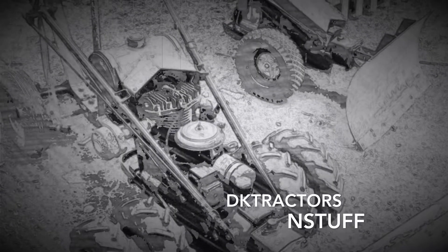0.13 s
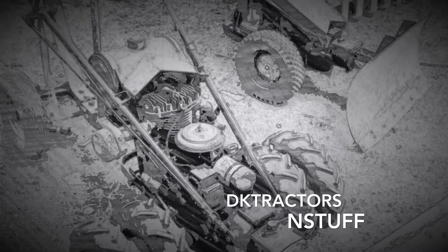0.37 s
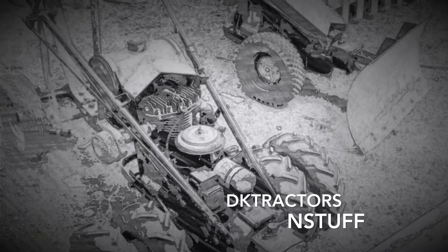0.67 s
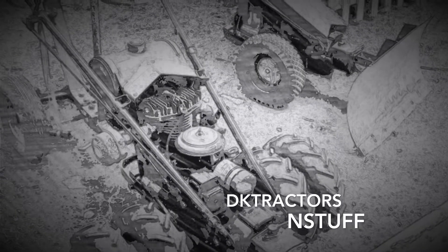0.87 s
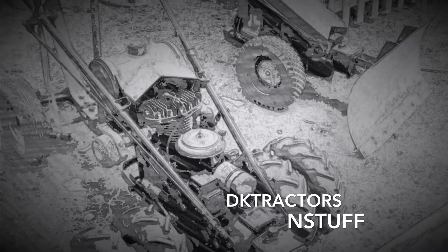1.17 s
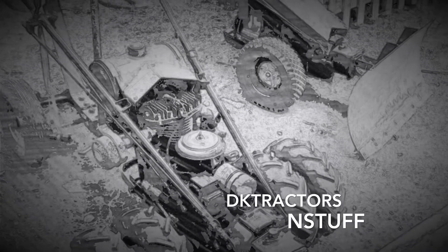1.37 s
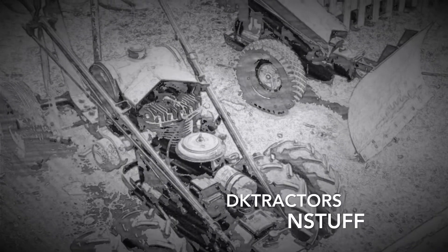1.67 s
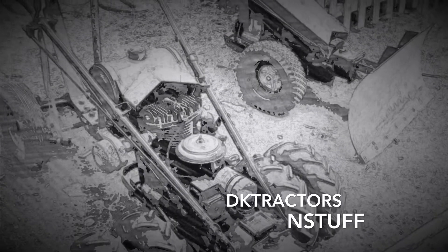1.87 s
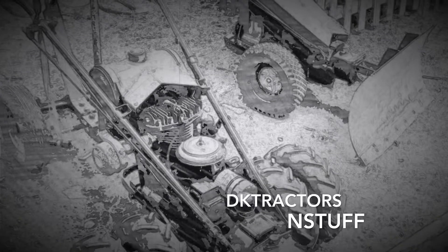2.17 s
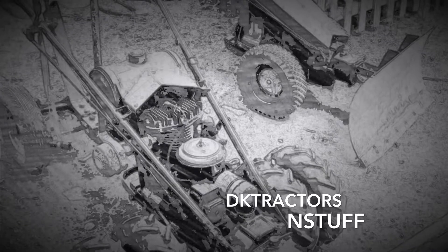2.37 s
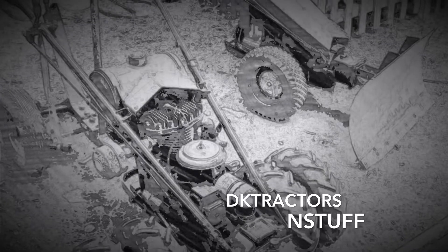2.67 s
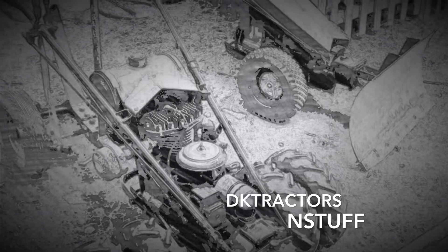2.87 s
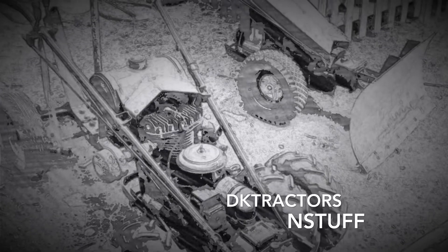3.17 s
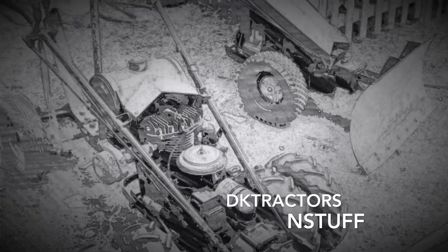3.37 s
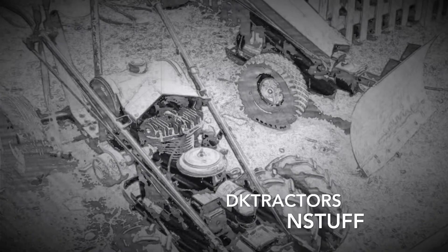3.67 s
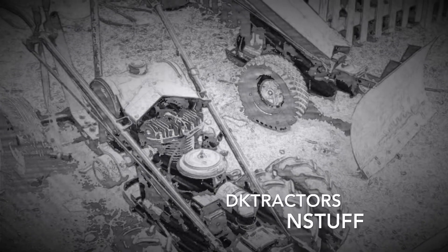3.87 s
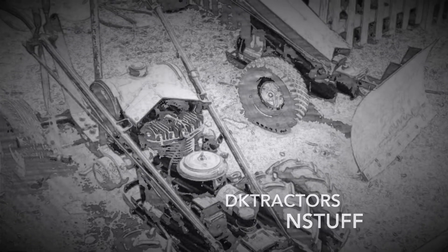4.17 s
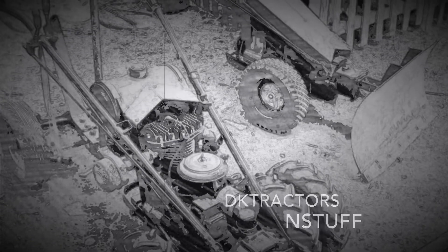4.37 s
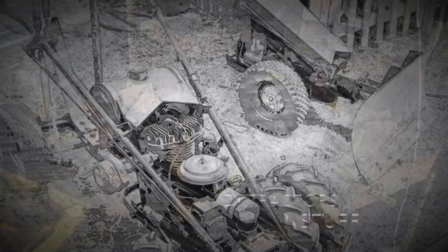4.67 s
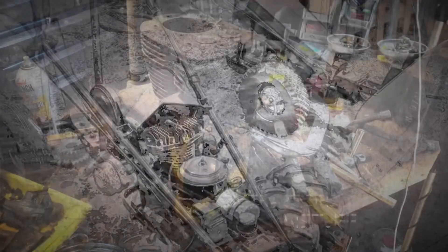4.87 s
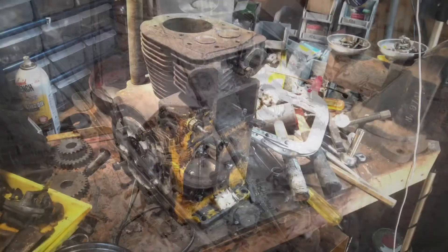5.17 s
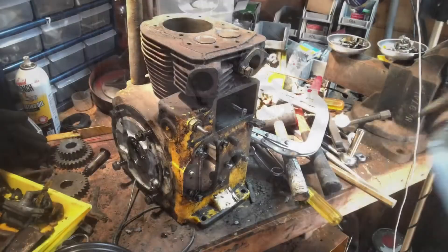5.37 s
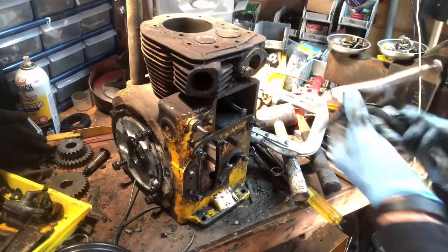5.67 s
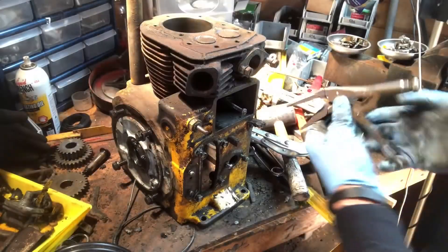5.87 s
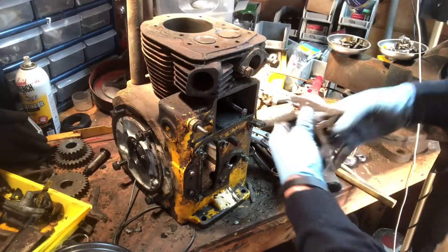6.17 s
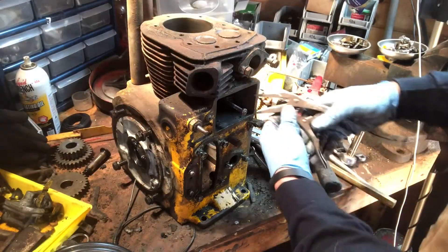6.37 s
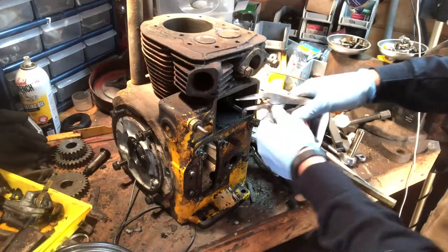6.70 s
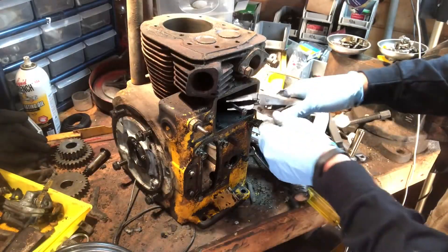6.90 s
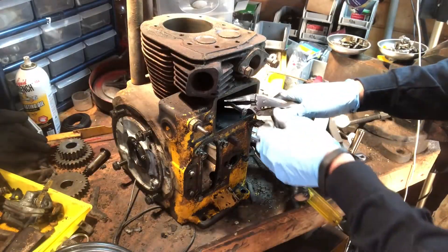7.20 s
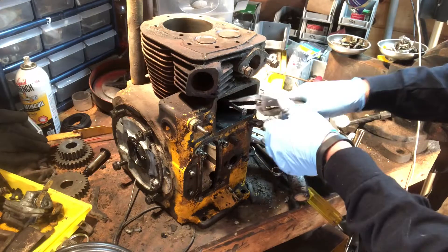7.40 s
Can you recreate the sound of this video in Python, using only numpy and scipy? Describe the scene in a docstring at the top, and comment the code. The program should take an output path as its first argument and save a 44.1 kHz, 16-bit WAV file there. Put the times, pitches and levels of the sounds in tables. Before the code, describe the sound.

Stuttering, clattering putter of a one-cylinder motor, dry and close, fills the first half; missed beats thin out as it evens into a rapid chug. It fades out gradually under faint room air. Then come bright clacks as tools are moved, soft thuds on a wooden bench, grainy glove rubbing, and small, quiet metallic ticks and scrapes against an engine block. The microphone is near the bench.

```python
"""Small engine fading into a workshop

A single-cylinder engine misses unevenly, then picks up speed. Each exhaust stroke rings decaying pipe
modes (thump) and gates gas noise (bark); noise bursts shaped by casing resonances make the clatter. It
fades out over room noise, faint tones and grainy glove rustle. Then filtered noise bursts snap and thud
on a bench, and narrow noise bands clink and slide as a steel hand tool on a cast-iron block.
"""
import sys
import numpy as np
from scipy import signal
from scipy.fft import rfft, irfft, next_fast_len
from scipy.io import wavfile
from scipy.ndimage import uniform_filter1d, map_coordinates

SR = 44100
rng = np.random.default_rng(int(sys.argv[2]) if len(sys.argv) > 2 else 0)


def persist_wave(psi):
    """Save psi, clipped to +-1, as 16-bit WAV."""
    counts = np.round(np.clip(psi, -1, 1) * 32767).astype(np.int16)
    wavfile.write(sys.argv[1], SR, np.atleast_2d(counts).T)


N = 332514

# Engine speed: (time [s], exhaust strokes per second [Hz])
STROKE_RATE = [(-.1, 11.199), (.581, 11.642), (.671, 10.949), (.947, 12.317), (1.102, 11.633),
               (1.886, 12.537), (2.203, 12.107), (2.974, 13.538), (3.37, 12.999), (3.402, 13.66),
               (4.018, 13.493), (4.63, 13.52), (4.686, 13.83), (5.6, 13.416)]
# Charges that fail or burn poorly, at the nearest stroke: (time [s], heat lost [dB])
MISFIRES = [(.06, 20), (.24, 18), (.41, 15.5), (.67, 20), (.85, 20.5), (1.01, 7), (1.27, 14), (1.68, 6.5),
            (2.09, 5.5)]
# Exhaust pipe and muffler modes: (frequency [Hz], base level [dB], t60 [s], polarity [+1/-1])
PIPE_MODES = [(76.4, 7.4, .09, 1), (122, 23.1, .031, -1), (166, 12.9, .051, 1), (245, 20.3, .0234, 1),
              (400, 25.8, .0156, -1), (507, 25.5, .0162, -1), (827, 34.7, .0101, -1)]
# Muffler shell modes, struck by the opening pulse: (frequency [Hz], base level [dB], t60 [s])
SHELL_MODES = [(502.7, -28, 0.3), (795, -19.5, 0.079), (1156, -25.5, .06)]
# Gas jet spectrum: (frequency [Hz], relative density [dB per Hz])
JET_SPECTRUM = [(300, -23.5), (1000, -9.5), (3000, 3.5), (6500, 5.5), (7800, 0), (9000, 3), (12000, 1),
                (15800, 0)]
# Bursts that shake the casing each cycle: (mean delay [s], mean level at zero heat [dB], t60 [s],
# centre [Hz], width [octaves], heat follow [dB per dB])
GEAR_BURSTS = [(.0002, -12, 0.067, 1089, 1.4, 0.44), (.022, -18, .04, 7970, 0.81, 0),
               (.013, -15, 0.25, 1714, 0.97, 0.01), (0.021, -12.5, 0.06, 2397, 2.8, 0),
               (0.023, -22.5, 0.024, 614, .5, 1), (0.037, -15.5, 0.09, 1756, 0.95, 0),
               (.043, -24, 0.049, 10030, .8, 0), (.061, -16.5, 0.02, 1402, 0.72, 0.5)]
# Casing spectrum before the panels: (frequency [Hz], relative density [dB per Hz])
CASING_SPECTRUM = [(150, -14), (205, 6), (270, -0.5), (340, -6.5), (660, -10.5), (900, -1.5), (970, -6.5),
                   (1100, -2), (1600, -7), (1950, -10.5), (2600, -7.5), (4800, -13.5), (6400, -15.5),
                   (7700, -22), (12000, -24.5), (15800, -30)]
# Sheet-metal resonances: (centre [Hz], width [Hz], peak gain [dB])
PANEL_MODES = [(500, 49, 3.5), (594, 74, 9), (805, 54, 1), (1023, 26, 3.5), (1306, 110, 1), (1520, 53, 4.5),
               (2286, 150, 2.5), (2480, 67, 2), (3770, 120, 6), (6500, 130, 2), (8450, 150, 4)]
# Workshop air spectrum: (frequency [Hz], relative density [dB per Hz])
AIR_SPECTRUM = [(20, -19), (45, -9), (80, -9), (120, -10.5), (220, -11), (400, -13.5), (800, -18),
                (1200, -22.5), (4000, -28), (15800, -36)]
# Wavering low tones: (frequency [Hz], mean level [dB])
LOW_TONES = [(123.8, -72), (199.2, -70.5), (301.5, -80)]
# Gloves and sleeves rub: (time [s], length [s], level [dB])
RUBS = [(5.302, 0.24, -60.5), (5.428, .19, -54), (5.561, .11, -63), (5.707, 0.14, -63.5),
        (5.856, .081, -68), (5.999, .15, -60), (6.17, .071, -71), (6.354, .13, -67), (6.498, .085, -69),
        (6.768, 0.11, -65), (7.129, .12, -75), (7.282, 0.13, -64), (7.406, 0.16, -62.5)]
# Dry bright snaps: (time [s], level [dB], centre [Hz], high ring level [dB])
SNAP_EVENTS = [(5.5166, -17, 5500, -21), (5.5628, -37, 5070, -41), (5.5827, -26, 6000, -38),
               (5.718, -28.5, 7180, -46), (5.877, -36, 7630, -65), (5.991, -26, 14700, -25),
               (6.1235, -30.5, 3080, -72), (6.1756, -31.5, 3210, -46), (6.2736, -42, 3070, -57.5),
               (6.3627, -43, 2940, -74)]
# Soft knocks on the bench: (time [s], level [dB], centre [Hz], width [octaves], t60 [s])
THUD_EVENTS = [(5.797, -39, 396, 1.33, 0.11), (5.812, -41, 80, 1.34, 0.35), (5.85, -62, 348, 1.5, 0.44),
               (5.875, -56, 500, .9, 0.18), (5.974, -38, 252, 0.14, .09), (5.99, -55, 350, 0.76, .2),
               (6.0, -47, 60.3, 1.1, 0.25), (6.055, -50.5, 60, .6, 0.21), (6.91, -55, 320, 0.2, 0.094),
               (7.402, -64, 950, .12, .1), (7.404, -58, 322, 0.24, 0.11)]
# Tool touches the block: (time [s], level [dB], scratch relative to it [dB],
# centre of modes struck [Hz], width [octaves])
TOUCHES = [(6.492, -46.5, 2, 5000, 0.94), (6.4966, -44, -10, 2700, 0.69), (6.522, -60, -1, 8000, .6),
           (6.546, -64, 1, 8000, .6), (6.763, -68, 2, 5000, .6), (6.78, -48.5, 1, 6500, 1),
           (6.909, -50, 3, 4000, .6), (6.918, -53, -1, 3300, .4), (7.295, -63.5, 3, 6000, .6),
           (7.402, -39.5, -1, 3400, 0.34)]
# Tool and block modes: (frequency [Hz], mean level [dB], t60 [s])
STEEL_MODES = [(958, -18, .1), (1684, -18, 0.19), (2070, -8, 0.16), (2320, -2, 0.083), (3110, -3.5, 0.1),
               (3240, -6, 0.086), (3400, -5, .07), (4310, -20, 0.091), (4670, -12, 0.11), (5590, -8, 0.054),
               (7300, -10, .05), (8490, -9, .05)]
# Tool slides, singing on one mode: (time [s], length [s], level [dB], frequency [Hz])
SLIDE_EVENTS = [(5.82, 0.095, -67, 1520), (6.71, 0.12, -71, 1700), (7.14, 0.038, -70, 2330),
                (7.16, 0.036, -60, 1714), (7.26, 0.074, -68, 1670), (7.338, .03, -64, 3300),
                (7.362, 0.032, -61, 3330)]

FIRST_S, LAST_S = -.0276, 5.42  # first exhaust opening, end of the engine
START_HEAT_DB, SETTLED_HEAT_DB, SETTLE_S = 7.5, -2.5, 2.4  # exponential settling
RICH_DB, SCATTER_DB = 2, 1  # harder burn after a miss; charge-to-charge scatter
MISS_LATE_S = .0009  # an unburnt charge leaves later
EVEN_MS, SLOW_DB_PER_MS = 74, 0.153  # even stroke spacing; slower strokes favour the lowest pipe mode
WASH_DB, WASH_DB_PER_MS = -34.5, 1.2  # steady hiss, weaker when strokes are further apart
FADE_FROM_S, FADE_TO_S = 3.66, 5.496
CLOTH_HZ, SNAP_T60_S = 4250, 0.06
TOP_HZ, LOW_CUT_HZ = 15850, 41.0
LEAD = SR // 10  # samples of room for strokes before time zero


def amp(db):
    """Gain of a level in dB."""
    return 10 ** (np.asarray(db) / 20)


def along(points, hz):
    """(Hz, value) points read on a log axis."""
    f, v = np.transpose(points)
    return np.interp(np.log(hz + 1), np.log(f + 1), v)


def filtered(x, response):
    """x times a response of frequency."""
    m = next_fast_len(x.shape[-1] + 8192)
    spectrum = rfft(x, m) * response(np.fft.rfftfreq(m, 1 / SR))
    return irfft(spectrum, m)[..., :x.shape[-1]]


def noise(response, size=N):
    """Coloured noise of rms 1."""
    x = filtered(rng.standard_normal(size), response)
    return x / np.sqrt(np.mean(x ** 2))


def hump(hz, centre_hz, octaves):
    """Bell-shaped gain on a log-frequency axis."""
    return np.exp(-.5 * (np.log2((hz + 1) / centre_hz) / octaves) ** 2)


def wobble(rate_hz):
    """Smooth random curve, rate_hz knots a second."""
    knots = rng.standard_normal(int(N * rate_hz / SR) + 4)
    return map_coordinates(knots, [np.arange(N) * rate_hz / SR])


def train(times_s, gains, shape):
    """A scaled copy of shape at each time."""
    samples = np.round(times_s * SR).astype(int) + LEAD
    kicks = np.bincount(samples, gains, N + 2 * LEAD)
    return signal.fftconvolve(kicks, shape)[LEAD:LEAD + N]


def add(out, at_s, sound):
    """Mix a sound in at a time."""
    part = out[round(at_s * SR):][:len(sound)]
    part += sound[:len(part)]


def stroke(t, length_s, swell=0.66):
    """A rub swells and stops; the smaller swell, the more abrupt."""
    return np.sin(np.pi * np.clip(t / length_s, 0, 1)) ** swell


def patchy(x, depth_db):
    """Random gain in small patches of time and frequency, for irregular texture."""
    z = signal.stft(x, nperseg=512)[2]
    field = uniform_filter1d(rng.standard_normal(z.shape), size=2, axis=0)
    field = uniform_filter1d(field, size=3, axis=1)
    return signal.istft(z * amp(depth_db * field / field.std()), nperseg=512)[1][:N]


def cycles():
    """Time of each exhaust opening [s] and its heat: how hard the charge burnt, in dB over a normal one."""
    t = np.arange(FIRST_S, LAST_S, 1 / SR)
    turns = np.cumsum(np.interp(t, *np.transpose(STROKE_RATE))) / SR
    times_s = np.interp(np.arange(int(turns[-1]) + 1), turns, t)
    lost_db = np.zeros(len(times_s))
    for when_s, db in MISFIRES:
        lost_db[np.argmin(np.abs(times_s - when_s))] = db
    missed = lost_db > 0
    after_miss = np.roll(missed, shift=1) * ~missed
    heat_db = SETTLED_HEAT_DB + (START_HEAT_DB - SETTLED_HEAT_DB) * np.exp(-times_s / SETTLE_S)
    heat_db += SCATTER_DB * rng.standard_normal(len(times_s))
    return times_s + MISS_LATE_S * missed, heat_db - lost_db + RICH_DB * after_miss


def exhaust(times_s, heat_db):
    """The valve opens gradually and rings the pipe; hot gas barks out as noise and hisses on."""
    t = np.arange(SR // 5) / SR
    count = len(times_s)
    opening = (1 - np.exp(-t / .02)) ** 2
    late_ms = 1000 * np.gradient(times_s) - EVEN_MS
    slow_db = SLOW_DB_PER_MS * late_ms

    thump = np.zeros(N)
    for hz, db, t60_s, sign in PIPE_MODES:
        # a fired charge feeds the low pipe modes and the muffler's high ones; a missed one only pumps air
        heat_share = 0.4 * (hz < 100) + 0.14 * (hz < 200) + 0.45 * (hz > 300)
        slow_share = (hz < 100) - 0.56 * (100 < hz < 200)
        mode_db = heat_db * heat_share + slow_db * slow_share + rng.normal(0, 1.0, count)
        ring = sign * amp(db - 60 * t / t60_s) * np.sin(2 * np.pi * hz * t) * opening
        thump += train(times_s, amp(0.26 - 0.15 * heat_db + mode_db), ring)
    for hz, db, t60_s in SHELL_MODES:
        ring = amp(db - 60 * t / t60_s) * np.sin(2 * np.pi * hz * t) * (1 - np.exp(-t / 0.0028))
        thump -= train(times_s + 0.0013, amp(.35 * heat_db + rng.normal(0, 3.6, count)), ring)

    # the inlet stroke sucks one short gulp
    inlet_s = times_s[:-1] + .25 * np.diff(times_s)
    suck = -np.exp(-.5 * ((t - .0325) / .0016) ** 2)
    gulp = train(inlet_s, amp(rng.normal(-17, 1.5, count - 1)), suck)

    blast = np.clip((t - .0008) / 0.0044, 0, 1) * np.clip((.0135 - t) / 0.0067, 0, 1)
    hiss = amp(-60 * t / 0.21) * (1 - np.exp(-t / 0.0082))
    flow = train(times_s, amp(1.14 * heat_db - 21.5), blast)
    flow += train(times_s, amp(0.49 * heat_db - 25.5), hiss)
    flow += amp(np.interp(np.arange(N) / SR, times_s, WASH_DB - WASH_DB_PER_MS * late_ms))
    jet = noise(lambda hz: amp(along(JET_SPECTRUM, hz))) * amp(1.6 * wobble(300))
    return thump + gulp + flow * patchy(jet, depth_db=3.5)


def casing(hz):
    """Casing response: a broad spectrum raised by sheet-metal resonances."""
    panels = 1 + sum((amp(db) - 1) / (1 + (2 * (hz - centre_hz) / width_hz) ** 2)
                     for centre_hz, width_hz, db in PANEL_MODES)
    return amp(along(CASING_SPECTRUM, hz)) * panels


def clatter(times_s, heat_db):
    """Valve gear: each burst shakes the casing in its own band, over a steady rattle."""
    t = np.arange(SR // 5) / SR
    out = amp(-23.0 + 1.8 * wobble(60)) * noise(casing)
    for delay_s, db, t60_s, centre_hz, octaves, follow in GEAR_BURSTS:
        jitter, scatter = rng.standard_normal((2, len(times_s)))
        knock = amp(-60 * t / t60_s) * (1 - np.exp(-t / 0.0023))
        burst_db = db + follow * heat_db + 1.3 * scatter
        level = train(times_s + delay_s + 0.00067 * jitter, amp(burst_db), knock)
        out += level * noise(lambda hz: casing(hz) * hump(hz, centre_hz, octaves))
    return patchy(out, depth_db=1.64)


def workshop():
    """Room air, wavering low tones and grainy glove noise, faint all the time and louder in rubs."""
    t = np.arange(N) / SR
    air = amp(-66.5 + 1.5 * wobble(3.2)) * noise(lambda hz: amp(along(AIR_SPECTRUM, hz)))
    hum = sum(amp(db + 2.8 * wobble(9)) * np.sin(2 * np.pi * hz * t + 0.54 * wobble(33))
              for hz, db in LOW_TONES)
    grain = amp(1.55 * wobble(60) + 1.3 * wobble(400))
    rustle = amp(-76.5 + 2.2 * wobble(18)) * noise(lambda hz: hump(hz, CLOTH_HZ, 0.75))
    for at_s, length_s, db in RUBS:
        cloth = noise(lambda hz: hump(hz, CLOTH_HZ, 1.33), size=SR // 4)
        add(rustle, at_s, amp(db) * stroke(t[:SR // 4], length_s, swell=0.83) * cloth)
    return air + hum + grain * patchy(rustle, depth_db=2.5)


def snaps():
    """A noise spike with a short bright tail and a thin high ring."""
    out, t = np.zeros(N), np.arange(SR // 4) / SR
    for at_s, db, centre_hz, ring_db in SNAP_EVENTS:
        decay = amp(-60 * t / 0.0035) + amp(-18.5 - 60 * t / SNAP_T60_S)
        burst = rng.standard_normal(len(t)) * decay * (1 - np.exp(-t / 0.00037))
        bright = filtered(burst, lambda hz: hump(hz, centre_hz, 2.3) / (1 + (2200 / (hz + 1)) ** 6))
        ring = amp(ring_db - 60 * t / 0.027) * np.sin(2 * np.pi * 15650 * t)
        ring *= 1 - np.exp(-t / 0.00083)
        add(out, at_s, amp(db) * bright + ring)
    return out


def thuds():
    """Dull noise that dies on the bench; a narrow knock has a pitch."""
    out, t = np.zeros(N), np.arange(SR // 4) / SR
    for at_s, db, centre_hz, octaves, t60_s in THUD_EVENTS:
        dull = min(1, 3 * octaves) * noise(lambda hz: hump(hz, centre_hz, octaves), size=len(t))
        note = 2 * max(0, 1 - 2 * octaves) * np.sin(2 * np.pi * centre_hz * t)
        add(out, at_s, amp(db - 60 * t / t60_s) * (1 - np.exp(-t / 0.0031)) * (dull + note))
    return out


def tool():
    """A touch rings modes near its centre, blurred by chattering contact; a slide sings over a scrape."""
    out, t = np.zeros(N), np.arange(SR // 4) / SR
    for at_s, db, scratch_db, centre_hz, octaves in TOUCHES:
        ring = np.zeros(len(t))
        for mode_hz, mode_db, t60_s in STEEL_MODES:
            decay = amp(mode_db + rng.normal(0, 1.5) - 60 * t / t60_s)
            blurred = noise(lambda hz: hump(hz, mode_hz, 0.036), size=len(t))
            ring += decay * hump(mode_hz, centre_hz, octaves) * blurred
        scratch = amp(scratch_db - 60 * t / 0.053) * noise(lambda hz: hump(hz, 3500, 1.4), size=len(t))
        add(out, at_s, amp(db) * (ring + scratch) * (1 - np.exp(-t / 0.00041)))
    for at_s, length_s, db, mode_hz in SLIDE_EVENTS:
        singing = noise(lambda hz: hump(hz, mode_hz, 0.027), size=len(t))
        scrape = amp(-11) * noise(lambda hz: hump(hz, mode_hz, .8), size=len(t))
        add(out, at_s, amp(db) * stroke(t, length_s) * (singing + scrape))
    return out


def scene():
    """The engine is faded out over the workshop and the handling sounds."""
    gone = np.clip((np.arange(N) / SR - FADE_FROM_S) / (FADE_TO_S - FADE_FROM_S), 0, 1)
    times_s, heat_db = cycles()
    engine = np.cos(np.pi / 2 * gone) ** 2 * (exhaust(times_s, heat_db) + clatter(times_s, heat_db))
    return (engine + workshop() + snaps() + thuds() + tool())[None]


def record(dry):
    """Round off the loudest peaks, then roll off the lows and cut steeply around TOP_HZ."""
    x = dry / (1 + np.abs(dry / 0.87) ** 6) ** (1 / 6)

    def band(hz):
        top = np.cos(np.pi / 2 * np.clip((hz - TOP_HZ + 150) / 250, 0, 1)) ** 2
        return top * hz ** 4 / np.sqrt(hz ** 8 + LOW_CUT_HZ ** 8)

    return filtered(x, band)


dry = scene()
out = record(dry)
persist_wave(out)
```